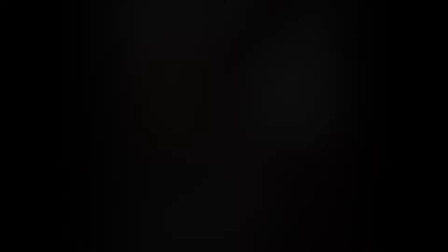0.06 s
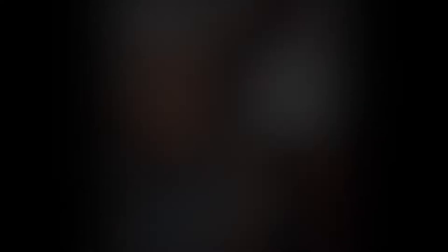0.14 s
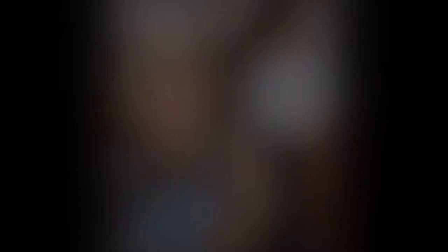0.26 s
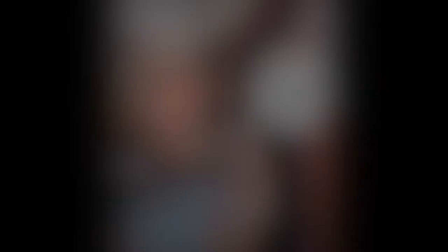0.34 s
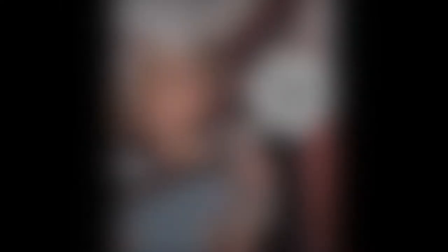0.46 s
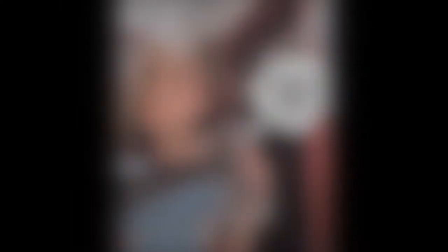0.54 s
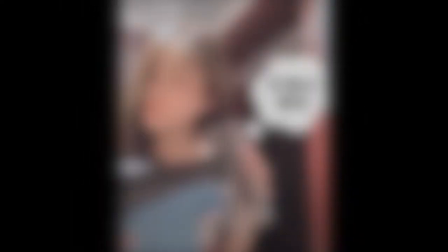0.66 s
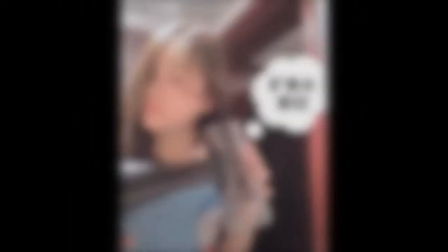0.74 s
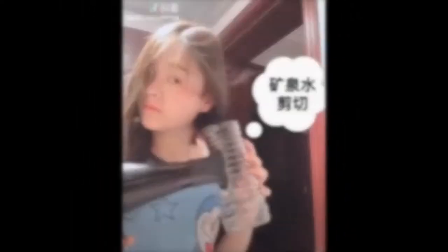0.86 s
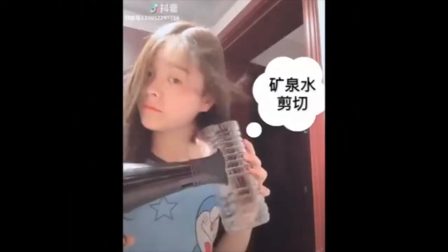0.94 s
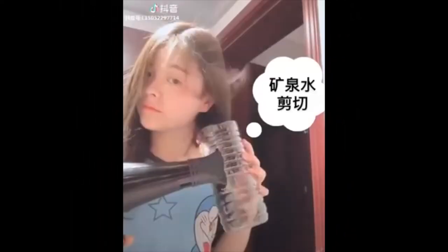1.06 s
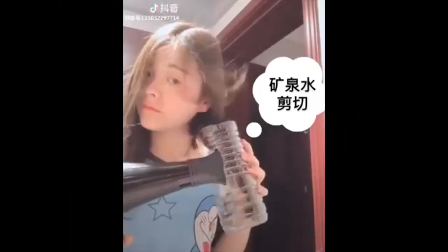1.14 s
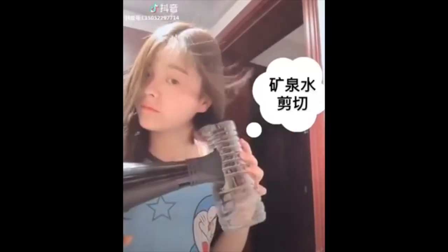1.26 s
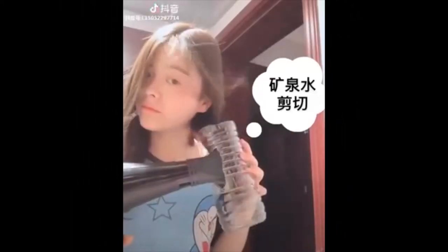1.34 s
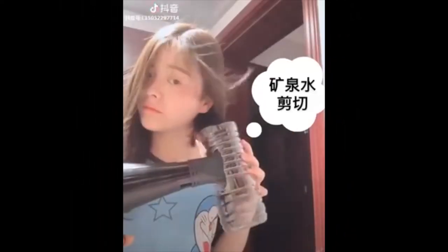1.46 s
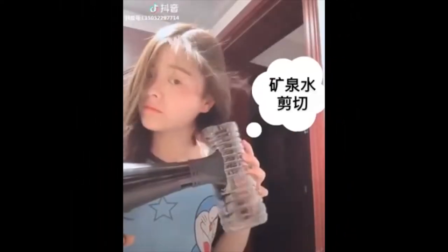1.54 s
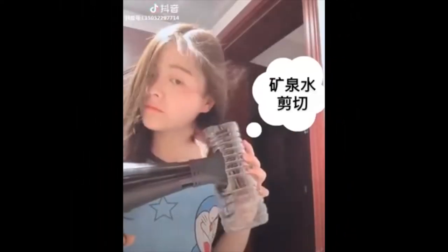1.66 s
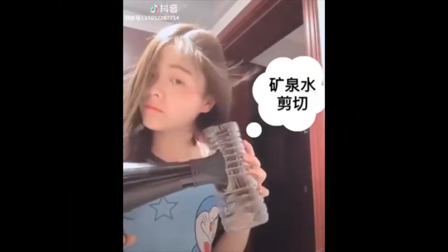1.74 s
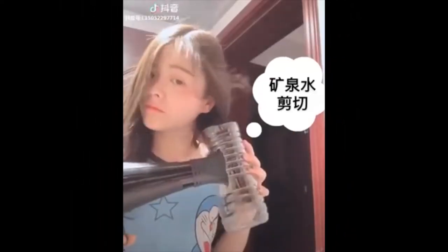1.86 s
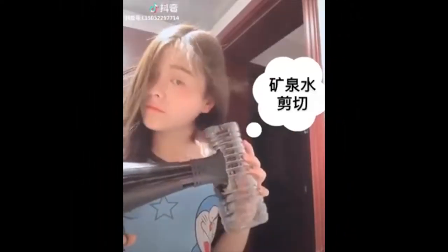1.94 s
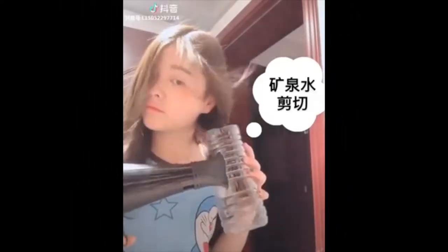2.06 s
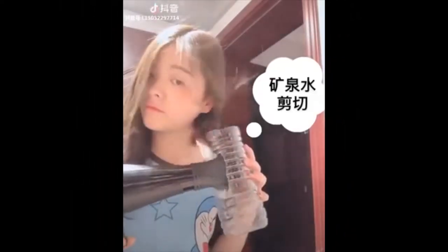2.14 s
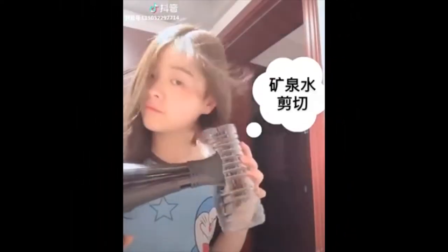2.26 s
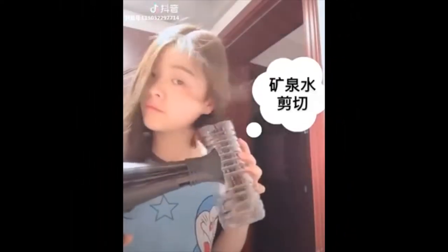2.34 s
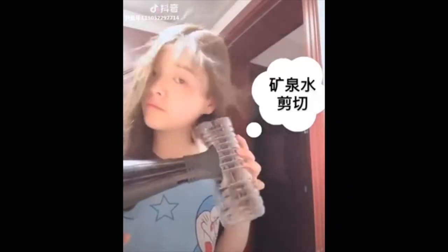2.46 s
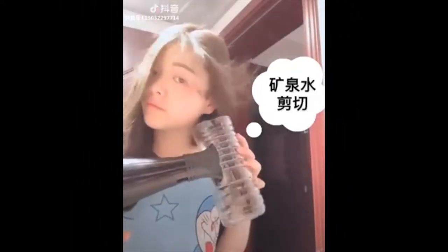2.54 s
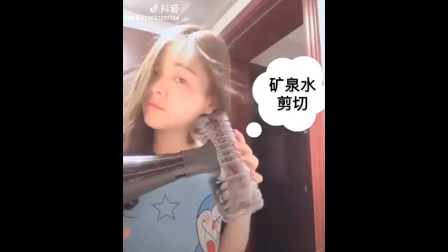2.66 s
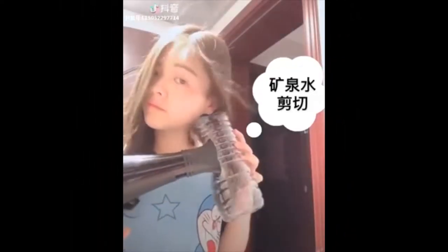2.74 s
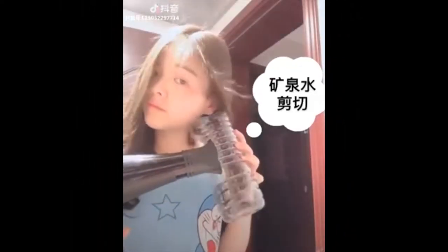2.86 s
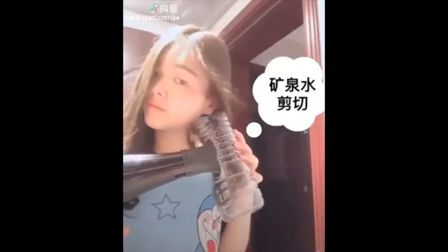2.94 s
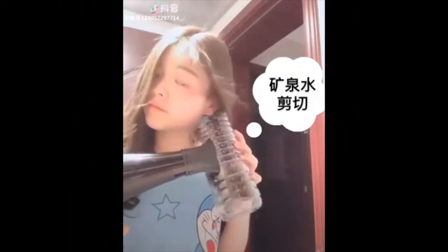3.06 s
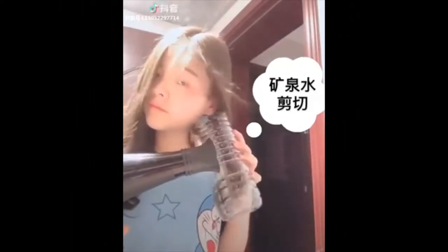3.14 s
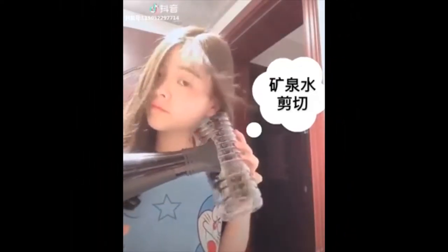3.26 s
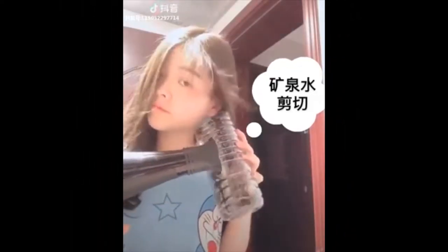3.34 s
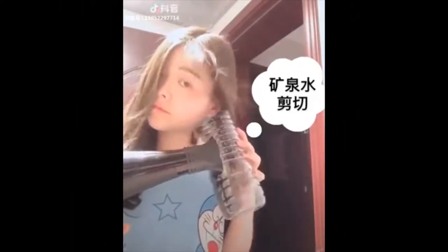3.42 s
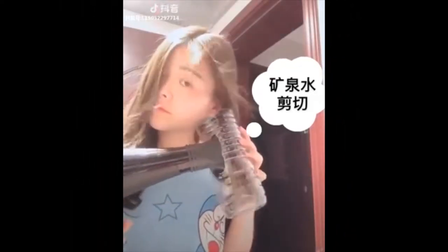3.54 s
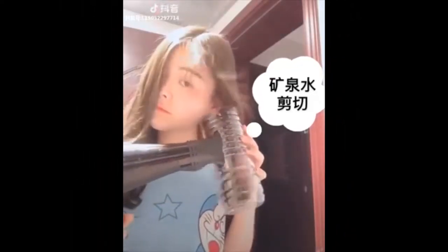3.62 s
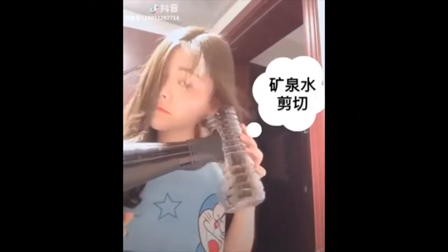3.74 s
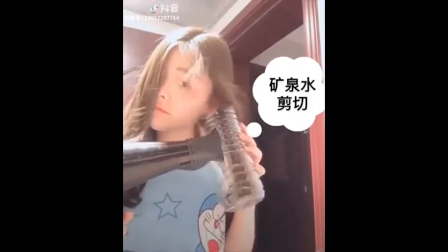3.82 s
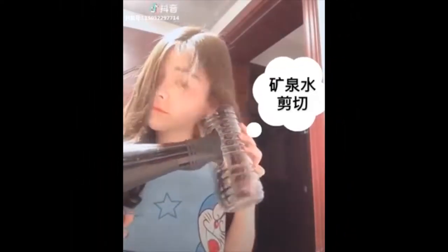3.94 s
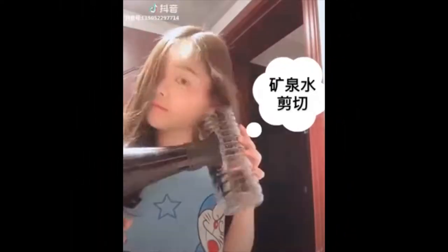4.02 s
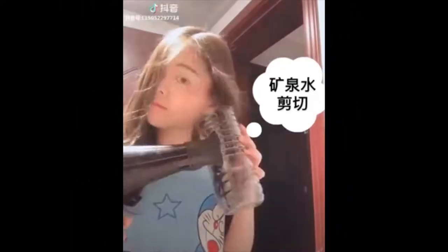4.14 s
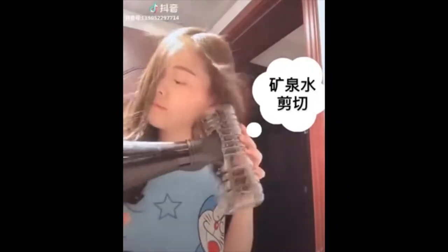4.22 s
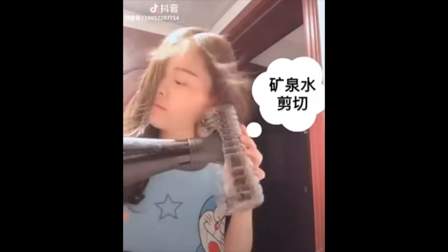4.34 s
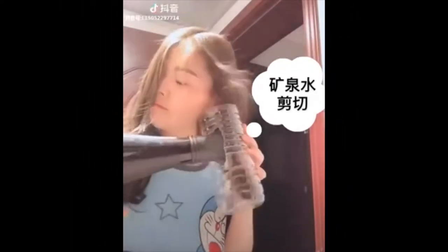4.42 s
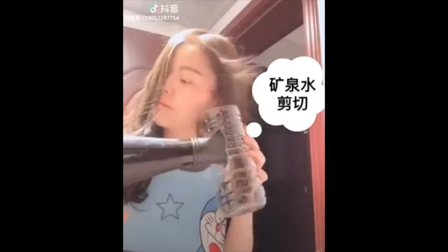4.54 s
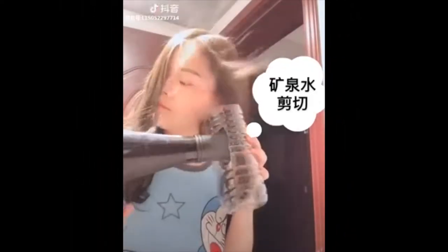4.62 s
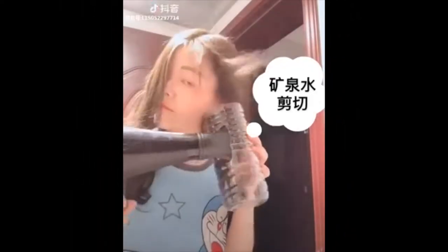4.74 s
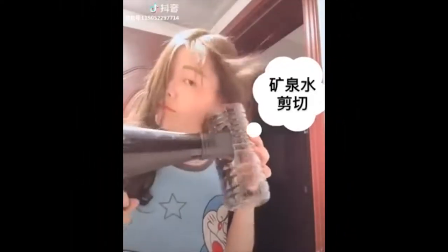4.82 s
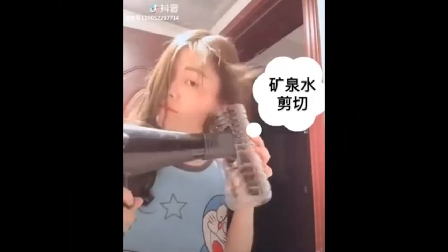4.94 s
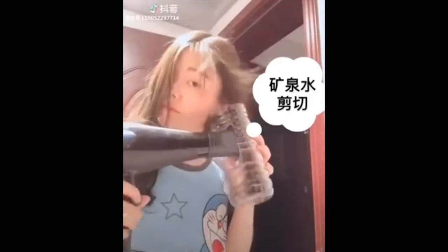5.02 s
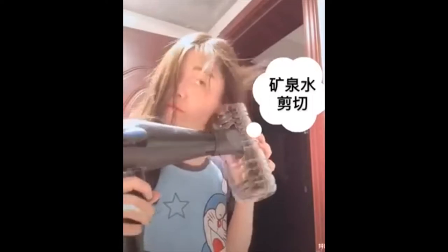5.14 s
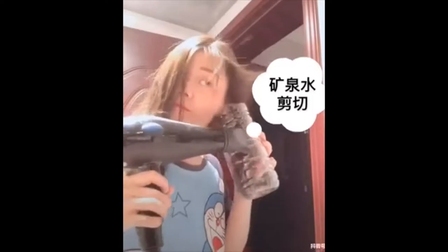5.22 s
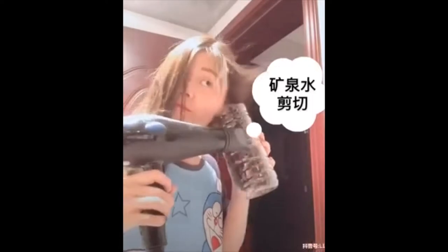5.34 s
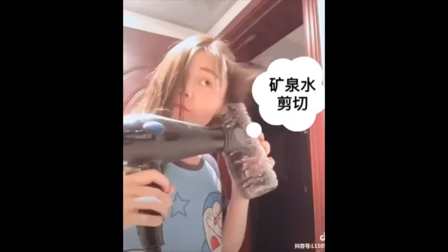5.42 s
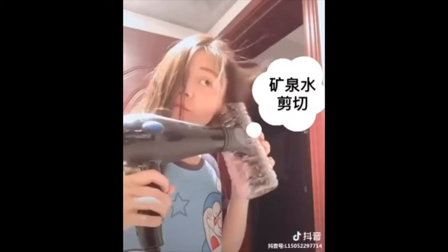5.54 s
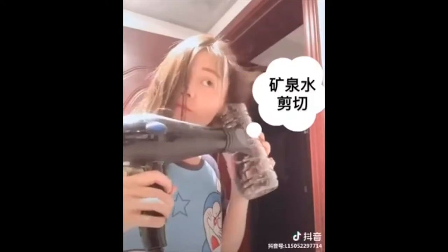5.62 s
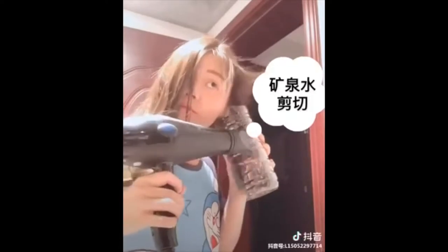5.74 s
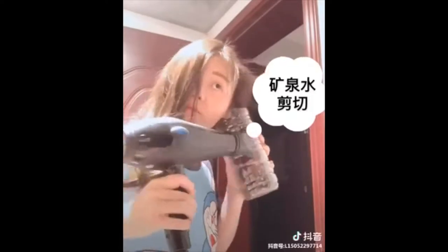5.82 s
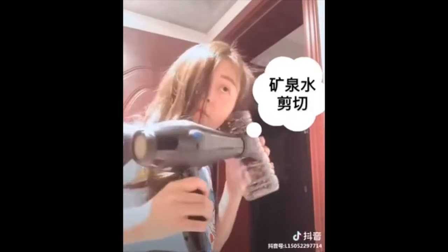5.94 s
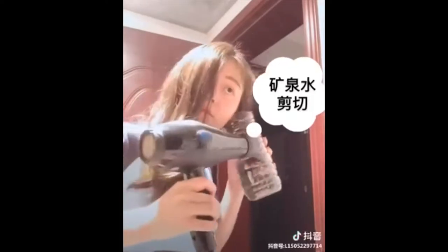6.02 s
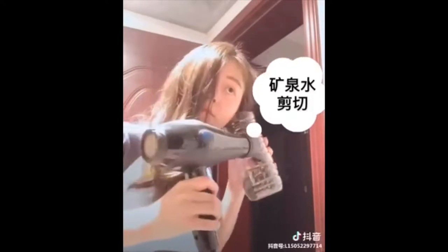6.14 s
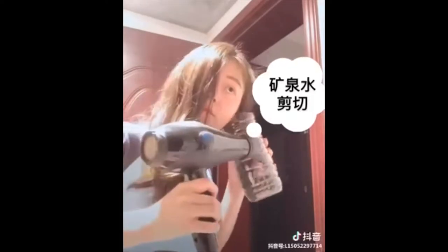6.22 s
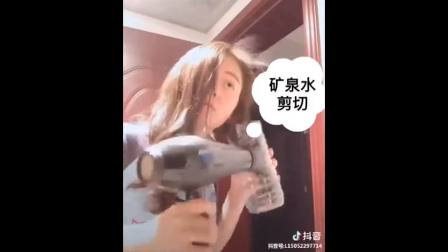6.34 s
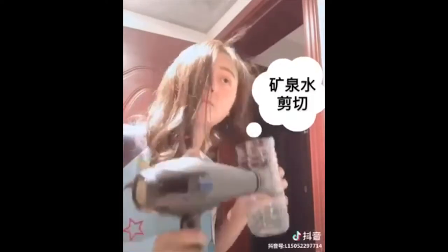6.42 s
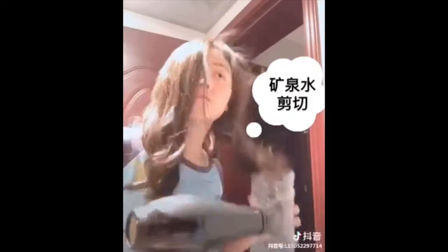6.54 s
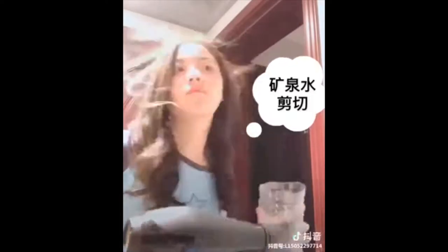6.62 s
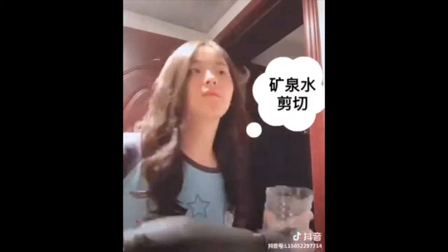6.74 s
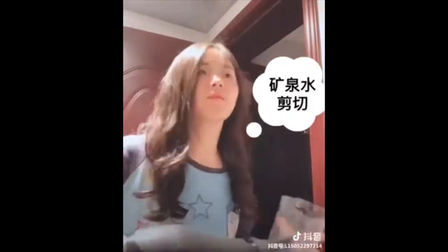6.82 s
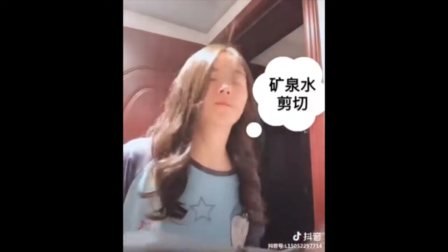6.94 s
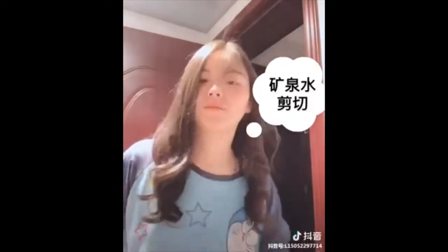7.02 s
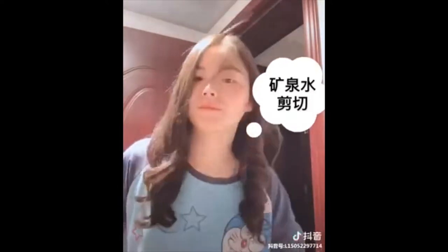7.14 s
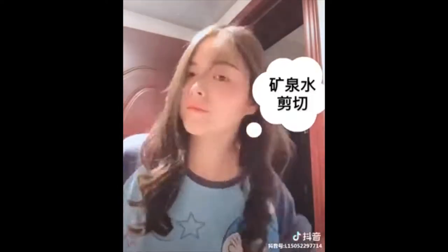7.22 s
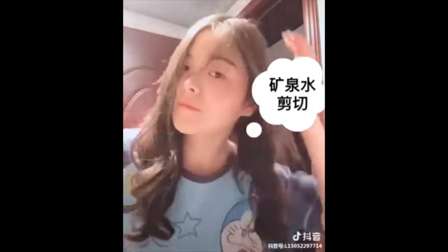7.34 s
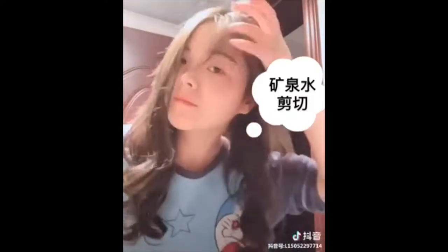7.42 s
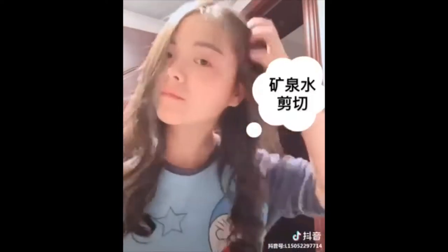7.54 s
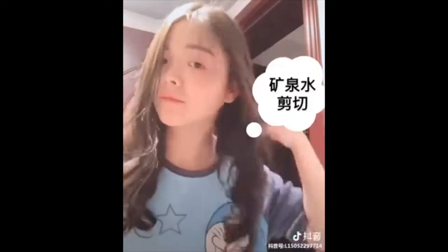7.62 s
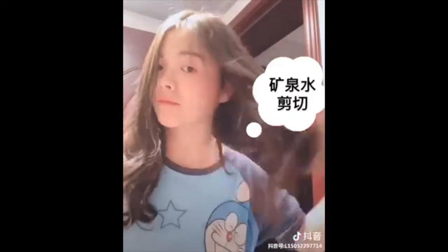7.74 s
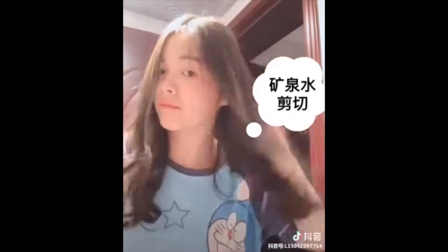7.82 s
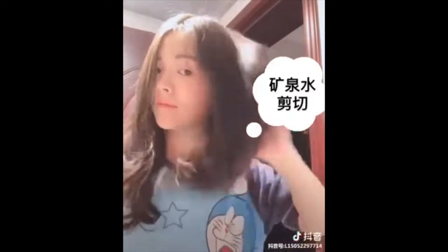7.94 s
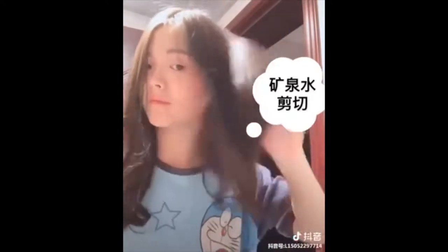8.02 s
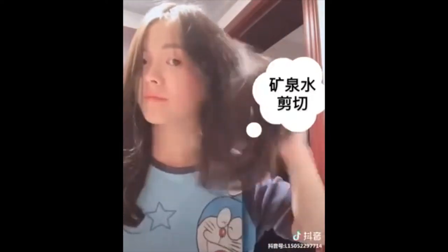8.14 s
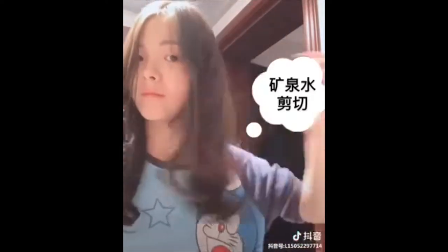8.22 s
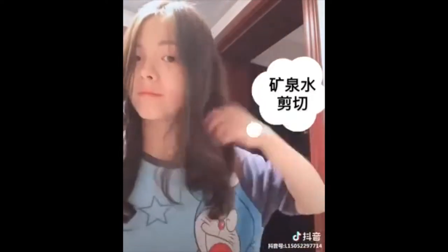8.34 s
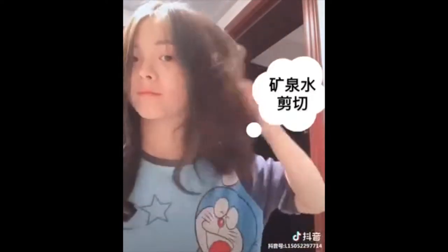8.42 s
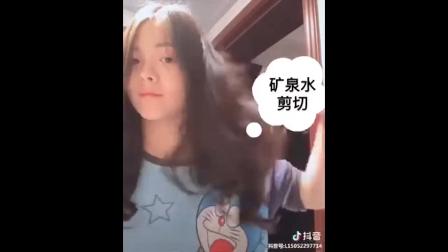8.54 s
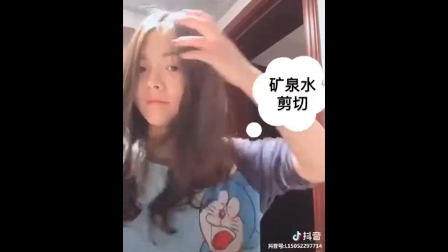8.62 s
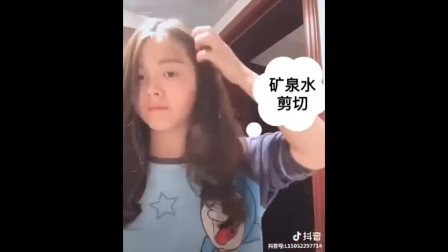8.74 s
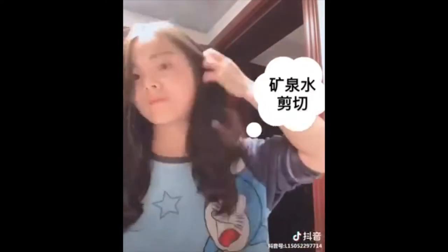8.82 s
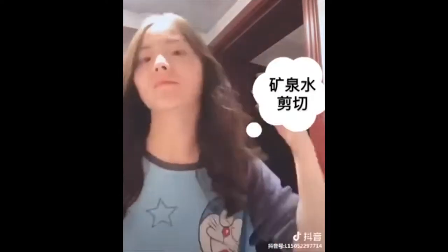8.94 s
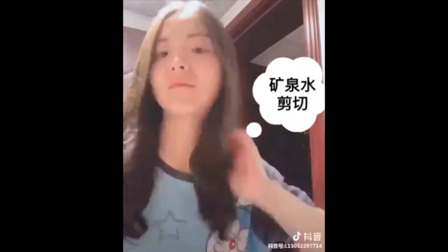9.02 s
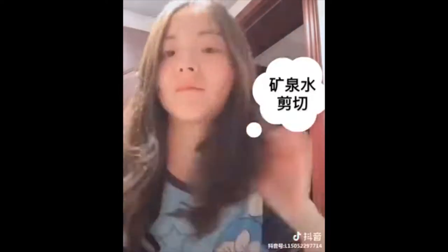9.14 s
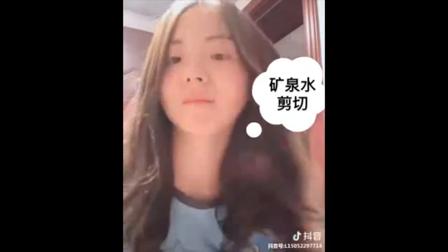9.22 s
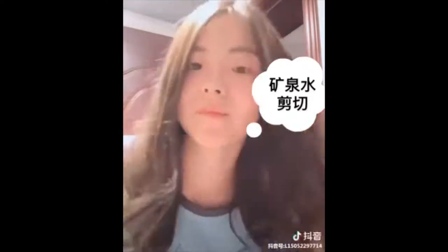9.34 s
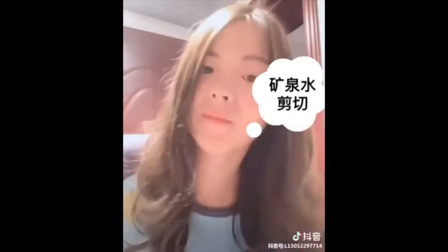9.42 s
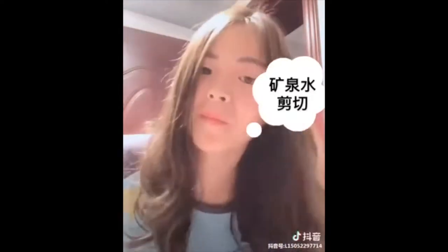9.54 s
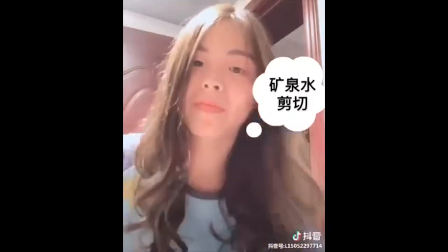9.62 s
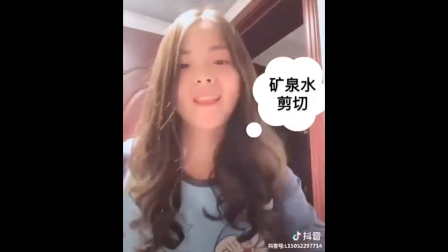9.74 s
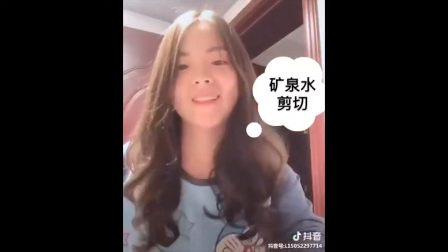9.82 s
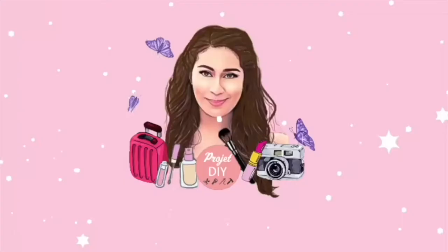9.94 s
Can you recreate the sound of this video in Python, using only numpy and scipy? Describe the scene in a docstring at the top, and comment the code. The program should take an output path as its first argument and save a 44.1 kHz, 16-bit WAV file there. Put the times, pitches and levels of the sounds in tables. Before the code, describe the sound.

In a small bedroom, close to the microphone, a hair dryer runs into a plastic bottle, making it drone hollowly under the rushing air. It grows more sizzling before it cuts off. Air whooshes by once, then a short, booming blast hits the microphone and briefly overloads it. Afterwards there is only quiet rustling of hair and cloth, with a few dull bumps and light plastic taps.

```python
"""Hair dryer and plastic bottle

A hair dryer blows into a cut plastic bottle in a small bedroom, and the bottle booms hollowly.
The dryer turns its hissing intake forward, is lowered and switched off; its jet whooshes past once.
A gust of air then brings short clacks, and the overloaded microphone rasps on the two hardest puffs.
Hair and sleeves rustle in the quiet room, among a few light taps and soft bumps."""
import sys
import numpy as np
from scipy import signal
from scipy.fft import rfft, irfft, next_fast_len
from scipy.io import wavfile
from scipy.ndimage import uniform_filter1d

SR = 44100
rng = np.random.default_rng(int(sys.argv[2]) if len(sys.argv) > 2 else 0)


def bounce(signal):
    """Save signal as a 16-bit WAV file at the path given by the first command-line argument."""
    frames = np.transpose(np.atleast_2d(signal))
    limited = np.clip(frames, -1, 1)
    pcm = np.round(limited * 32767).astype(np.int16)
    wavfile.write(sys.argv[1], SR, pcm)


N = 439677
T = np.arange(N) / SR
HZ = np.maximum(np.fft.rfftfreq(next_fast_len(N), 1 / SR), 1)

# how far the dryer's intake faces forward (time [s], share [0-1])
INTAKE_TURN = [(4.4, 0.27), (5.2, 0.45), (5.7, 0.68), (6.0, 0.74), (6.7, 0.7), (6.9, 0.2)]
# tone colour of the air jet (frequency [Hz], relative level [dB])
JET_COLOUR = [(45, -48), (75, -41.5), (180, -32.5), (290, -10.5), (420, -19.3), (560, -20.3), (1000, -32.7),
              (2000, -34.6), (4400, -26.8), (7000, -34), (9000, -34), (13000, -39.8)]
# where the bottle, barrel and space around them ring (frequency [Hz], width [Hz], boost [dB])
BOTTLE_RINGS = [(92.2, 23, 17.8), (118, 12, -6), (135, 22, 14.7), (170, 40, 1), (190, 16, -4),
                (218.2, 26, 14.4), (317.4, 58, 4.5), (395, 50, 15.3), (472, 45, 6.5), (551, 22, 3),
                (582, 25, -4), (623.4, 16, 5.5), (698, 17, 10.5), (732, 24, -5), (810, 23, 12),
                (890, 66, 17), (1036, 40, 4), (1135, 100, 10), (1178, 24, -7), (1268, 250, 17.8),
                (1544, 150, 6), (1800, 280, 12.5), (2252, 140, 12), (2375, 140, 8.5), (2844, 370, 5),
                (3335, 220, 6.5), (3520, 110, -4), (3680, 100, 9), (3910, 130, 4), (4590, 100, 5),
                (5410, 110, 3), (5650, 120, -3), (6550, 2300, 6.5), (7450, 300, -3), (7830, 200, 3.5)]
# tone colour of air rushing into the intake (frequency [Hz], relative level [dB])
INTAKE_COLOUR = [(600, -17.5), (1500, -32.8), (3000, -29.7), (4600, -36.5), (7000, -27.5), (7700, -32.5),
                 (10500, -32), (13000, -34)]
# where the fan housing and grille ring (frequency [Hz], width [Hz], boost [dB])
HOUSING_RINGS = [(858, 90, 10), (1032, 100, 10), (1288, 170, 20.5), (1512, 120, 8.5), (1765, 220, 10.5),
                 (2430, 240, 6), (2760, 160, -3), (2920, 110, 7), (4250, 900, 9.5), (4740, 220, -4),
                 (5380, 450, 7), (5750, 200, -3), (7180, 160, 5), (8950, 400, 5.5), (9600, 250, 3)]
# whine of motor and fan (frequency [Hz], level against the hiss [dB], width [Hz])
WHINE_TONES = [(4119, -24, 12), (4340, -20, 7), (8678, -26, 18)]
# swells of a high whistle (time [s], level against the hiss [dB], half length [s])
WHISTLE_SWELLS = [(3.9, -22, .1), (5.06, -21.5, .1)]
# hisses at the bottle's edge (width [Hz], path of (time [s], pitch [Hz], level against the hiss [dB]))
EDGE_HISSES = [(220, [(4.3, 2290, -40), (5.2, 2300, -13), (5.8, 2330, -14), (6.05, 2400, -20),
               (6.35, 2450, -14), (6.6, 2450, -28)]), (420, [(5.4, 4100, -40), (5.98, 4050, -13.5),
               (6.4, 4100, -13), (6.6, 4320, -8.5), (6.9, 4300, -18)]), (450, [(5.8, 5300, -40),
               (6.02, 5250, -12), (6.4, 5250, -13), (6.57, 5430, -9), (6.9, 5400, -22)]),
               (800, [(5.4, 6900, -40), (5.7, 6900, -15), (5.9, 6850, -8.5), (6.25, 6250, -11.5),
               (6.65, 6750, -11), (6.9, 6700, -16)])]
# tone colour of the bare nozzle (frequency [Hz], relative level [dB])
SIZZLE_COLOUR = [(7500, -25.5), (8800, 0.5), (10500, -3.5), (13000, -1)]
# tone colour of the passing jet (frequency [Hz], relative level [dB])
WHOOSH_COLOUR = [(59, -59), (100, -22), (250, -19), (490, -8.5), (678, -29), (815, -19), (1410, -28),
                 (1770, -24), (2170, -23), (2770, -26), (5530, -19.5), (10200, -33), (13000, -54)]
# where the open bottle rings (frequency [Hz], width [Hz], boost [dB])
OPEN_BOTTLE_RINGS = [(380, 70, 7), (505, 70, 10.5), (1135, 90, 15), (1400, 120, 14), (2160, 230, 12.5),
                     (2480, 110, 8), (2760, 160, -5), (3740, 200, 8), (4010, 130, 7), (4280, 180, 8.5),
                     (5400, 260, 5.5), (6750, 450, 6.5), (7900, 900, -2.5)]

# hum of the microphone's opening in the gust (frequency [Hz], relative level [dB])
MIC_COLOUR = [(45, -41), (90, -30), (130, -13.5), (200, -15), (238, -11), (300, -13), (345, -1), (415, 4),
              (455, -5), (482, 0), (535, -16), (570, -17), (605, -14), (655, -32)]
# low tones of the hollow ring under the gust (frequency [Hz], level [dB])
HOLLOW_TONES = [(237, -31), (350, -13.5), (398, -11)]
# tone colour of the gust's rush (frequency [Hz], relative level [dB])
RUSH_COLOUR = [(500, -28), (700, -3), (830, 3), (1050, -11.5), (1400, 0), (1850, -7), (2250, -5),
               (4800, -19.5), (7000, -18.5), (13000, -34)]
# narrow peaks in that rush (frequency [Hz], width [Hz], boost [dB])
RUSH_PEAKS = [(1610, 60, 7), (2930, 110, 7), (3950, 200, 6), (4580, 130, 4), (6820, 150, 6), (7130, 100, 6)]
# hissing surges in the gust (time [s], level [dB], half length [s])
GUST_SURGES = [(7.262, -28.5, .012), (7.326, -33.5, .004), (7.345, -30, .009), (7.393, -40, .011),
               (7.486, -33, .016), (7.57, -42, .022), (7.66, -43.5, .026)]
# puffs of air hitting the microphone (time [s], level [dB], half length [s])
AIR_PUFFS = [(7.2735, 3, .0043), (7.287, -3.5, .005), (7.303, -6, .0035), (7.321, -6.5, .004),
             (7.343, 3.5, .0036), (7.361, -6, .0045), (7.432, -6, .004), (7.456, -9.5, .005),
             (7.485, -12.5, .004), (7.57, -17, .004), (7.597, -20, .005)]
# short clacks and two rasps of the overloaded mic (time [s], level [dB], half length [s], pitch [Hz])
CLACKS_AND_RASPS = [(7.27, -28, .003, 2200), (7.272, -23, .003, 1250), (7.341, -25, .003, 1200),
                    (7.304, -36, .003, 2850), (7.313, -46, .008, 7200), (7.33, -31.5, .0035, 5850),
                    (7.348, -42, .004, 11000), (7.393, -40, .006, 3000), (7.576, -41, .003, 1650)]

# strokes through the hair (time [s], level [dB], half length [s])
HAIR_STROKES = [(7.83, -73, .025), (7.95, -66.5, .018), (8.005, -69, .016), (8.06, -69, .012),
                (8.127, -67.5, .012), (8.205, -64.5, .011), (8.35, -65.5, .009), (8.46, -73.5, .03),
                (8.87, -67.5, .06), (9.15, -73, .03), (9.295, -68, .018), (9.33, -64.5, .016)]
# hair squeaking between fingers (time [s], level [dB], half length [s], pitch [Hz])
HAIR_SQUEAKS = [(8.755, -73, .045, 4780), (8.79, -74.5, .06, 3850)]
# scuffs of cloth (time [s], level [dB], half length [s], pitch [Hz])
CLOTH_SCUFFS = [(9.796, -62, 0.013, 12000), (9.905, -68, .01, 8400), (9.95, -61, 0.011, 7200)]
# light taps on plastic (time [s], level [dB], half length [s])
PLASTIC_TAPS = [(9.488, -58.5, 0.02), (9.574, -55, 0.016)]
# tone colour of the taps (frequency [Hz], relative level [dB])
TAP_COLOUR = [(800, -8), (2500, -6), (6000, -13), (12000, -26)]
# where the tapped plastic rings (frequency [Hz], width [Hz], boost [dB])
TAP_RINGS = [(2520, 260, 11), (3300, 340, 12), (4270, 200, 13)]
# dull bumps of a moving body (time [s], level [dB], half length [s])
BODY_BUMPS = [(8.25, -57, 0.045), (8.556, -49.5, 0.055), (8.779, -51, 0.031)]
# soft nudges of the microphone (time [s], level [dB], half length [s])
MIC_NUDGES = [(9.876, -44.5, 0.011), (9.933, -43.5, 0.008)]
# tones that a nudge rings with (frequency [Hz], relative level [dB])
NUDGE_TONES = [(435, 0), (895, -10), (1145, -19)]
# tone colour of the quiet room (frequency [Hz], relative level [dB])
ROOM_COLOUR = [(30, -20), (70, -13), (130, -9), (200, -13), (300, -8), (440, -7), (700, -20), (1100, -26),
               (2500, -28.5), (5000, -36), (8000, -39), (13000, -39)]
# where the room rings (frequency [Hz], width [Hz], boost [dB])
ROOM_RINGS = [(101.2, 37, 10), (132.2, 13, 6), (240, 16, 9), (890, 83, 4), (1500, 400, 6.5)]


def dryer(split_hz=650, boom_db=-21, nozzle_db=-29, intake_db=-24):
    """The jet makes the bottle boom; turning swaps nozzle for intake hiss. Gives (sound, hiss gain)."""
    turn = np.clip(in_time(INTAKE_TURN)[0], 0, 1)
    jet = colour(JET_COLOUR, BOTTLE_RINGS)
    boom = steadied(noise(jet * below(split_hz)), window_s=0.32)
    nozzle = np.sqrt(1 - turn) * noise(jet * above(split_hz))
    intake = np.sqrt(turn) * noise(colour(INTAKE_COLOUR, HOUSING_RINGS) * above(split_hz))
    hiss = nozzle + intake + motor_whine() + edge_hiss() + sizzle(turn)
    boom_gain = dryer_gain(near_db=2.5, loss_db=8) * from_db(boom_db)
    hiss_db = (1 - turn) * nozzle_db + turn * intake_db
    hiss_gain = dryer_gain(near_db=0.8, loss_db=12.5) * from_db(hiss_db)
    return boom_gain * boom + hiss_gain * hiss, hiss_gain


def dryer_gain(near_db, loss_db, off_s=6.857, coast_db_per_s=70):
    """The dryer fades in, swings nearer, is lowered and dies away once it is switched off."""
    nearer_db = near_db * swell(time_s=6.64, db=0, half_s=.07)
    lowered_db = loss_db * ramp(start_s=6.705, length_s=0.12)
    return fade_in() * from_db(nearer_db - lowered_db - coast_db_per_s * since(off_s))


def motor_whine():
    """An unsteady load blurs each motor tone; a high whistle comes and goes with the dryer's angle."""
    tones = sum(from_db(db) * rms_one(1 / (1 + ((HZ - hz) / width) ** 2))
                for hz, db, width in WHINE_TONES)
    whistle = swells(WHISTLE_SWELLS) * band(rng.standard_normal(N), hz=8720, octaves=.008)
    return filtered(rng.standard_normal(N), tones) + whistle


def edge_hiss():
    """Narrow hisses swell and glide as the jet grazes the bottle's edge at a changing angle."""
    hiss = 0
    for width_hz, path in EDGE_HISSES:
        pitch_hz, db = in_time(path)
        tone = np.sqrt(2) * np.cos(2 * np.pi * np.cumsum(pitch_hz) / SR)
        flutter = signal.lfilter(*signal.butter(2, width_hz / 2, fs=SR), rng.standard_normal(N))
        hiss = hiss + from_db(db) * tone * rms_one(flutter)
    return hiss


def sizzle(turn):
    """The nozzle slips out of the bottle and sizzles brightly, less so as the intake turns forward."""
    exposed = ramp(start_s=5.1, length_s=0.38) * np.sqrt(1 - turn)
    return from_db(-16.5) * exposed * noise(colour(SIZZLE_COLOUR))


def whoosh(time_s=7.0165, db=-13.3, half_s=.012):
    """The jet sweeps across the microphone: a hard core inside a softer, wider fringe."""
    core = swell(time_s, db, half_s)
    fringe = swell(time_s, db - 12, half_s * 2.2)
    air = steadied(noise(colour(WHOOSH_COLOUR, OPEN_BOTTLE_RINGS)), window_s=0.015)
    return air * np.hypot(core, fringe)


def gust(peak_s=7.272, end_s=7.712, rise_db_per_s=779, ebb_db_per_s=44.5, fall_db_per_s=326):
    """Swirling air booms in the microphone's opening, with a surging rush and a run of hard puffs."""
    rise_db = rise_db_per_s * np.minimum(T - peak_s, 0)
    force = from_db(rise_db - ebb_db_per_s * since(peak_s) - fall_db_per_s * since(end_s)) + 1e-18
    swirls = from_db(-11.5) * steadied(noise(colour(MIC_COLOUR) * below(750)), window_s=0.028)
    rush_gain = np.hypot(from_db(-34.5) * force, swells(GUST_SURGES))
    rush = rush_gain * noise(colour(RUSH_COLOUR, RUSH_PEAKS))
    # a hard puff pushes the boom aside while it lasts
    boom_share = 1 - np.clip(swells(AIR_PUFFS) / force, 0, 1)
    return boom_share * force * (swirls + hollow_ring()) + rush + mic_rings(AIR_PUFFS, hz=395)


def hollow_ring(in_step_s=7.281):
    """Low tones line up at one moment and throb against each other."""
    return sum(from_db(db) * np.cos(2 * np.pi * hz * (T - in_step_s)) for hz, db in HOLLOW_TONES)


def mic_rings(pushes, hz):
    """Each push makes the microphone's opening ring briefly at one pitch."""
    return sum(swell(time_s, db, half_s) * np.cos(2 * np.pi * hz * (T - time_s))
               for time_s, db, half_s in pushes)


def clacks_and_rasps():
    """Short clacks, and the rasp of the overloaded microphone on the two hardest puffs."""
    return bursts(rng.standard_normal(N), CLACKS_AND_RASPS, width_hz=650)


def rustles(grain_db=3, grain_hz=300):
    """Surfaces catch and slip unevenly: the sliding switch, hair and cloth."""
    friction = rng.standard_normal(N) * from_db(grain_db * noise(below(grain_hz, order=2)))
    switch = swell(time_s=6.9, db=-32, half_s=0.019) * band(friction, hz=1550, octaves=1.1)
    strokes = swells(HAIR_STROKES) * band(friction, hz=4000, octaves=2.5)
    squeaks = bursts(friction, HAIR_SQUEAKS, width_hz=220)
    cloth = bursts(friction, CLOTH_SCUFFS, width_hz=1200)
    return switch + strokes + squeaks + cloth


def taps():
    """Two brushing touches make a small plastic object ring."""
    return swells(PLASTIC_TAPS) * noise(colour(TAP_COLOUR, TAP_RINGS))


def movements():
    """A body shifts with dull bumps; the nudged microphone rings and scuffs softly."""
    bumps = swells(BODY_BUMPS) * steadied(noise(hump(100, octaves=0.13)), window_s=.04)
    nudges = sum(from_db(db) * mic_rings(MIC_NUDGES, hz) for hz, db in NUDGE_TONES)
    scuff = from_db(-20) * swells(MIC_NUDGES) * noise(hump(1000, octaves=0.6))
    return bumps + nudges + scuff


def thin_hiss(gain):
    """A thin, very high hiss whose level follows the given gain."""
    return gain * from_db(-15) * noise(above(9700, order=40) * below(12600, order=12))


def wall_echoes(x, decay_s, echo_db):
    """Add a dense tail of echoes from the walls, falling 60 dB in decay_s."""
    t = T[:SR // 2]
    tail = rng.standard_normal(len(t)) * from_db(-60 * t / decay_s) * (t > .004)
    return x + from_db(echo_db) * signal.fftconvolve(x, tail / np.linalg.norm(tail))[:N]


def room_hum(x, hz=238, decay_s=0.49, hum_db=1):
    """A wave caught between the walls hums on after a loud sound."""
    decay = from_db(-60 / (decay_s * SR))  # share left after each sample
    feedback = [1, -2 * decay * np.cos(2 * np.pi * hz / SR), decay * decay]
    return x + from_db(hum_db) * signal.lfilter([1 - decay, 0, decay - 1], feedback, x)


def quiet_room():
    """A faint, low noise fills the bedroom."""
    return fade_in() * from_db(-56) * noise(colour(ROOM_COLOUR, ROOM_RINGS))


def from_db(db):
    """Turn decibels into a gain, the number a sound is multiplied by."""
    return 10 ** (np.asarray(db) / 20)


def rms_one(x):
    """Scale to an average power of one."""
    return x / np.sqrt(np.mean(x ** 2) + 1e-20)


def since(time_s):
    """Seconds gone by after a moment, zero before it."""
    return np.maximum(T - time_s, 0)


def ramp(start_s, length_s):
    """An even move from 0 to 1."""
    return np.minimum(since(start_s) / length_s, 1)


def fade_in():
    """The opening rise from silence."""
    return ramp(start_s=0.13, length_s=0.77) ** 1.48


def in_time(rows):
    """Join timed points into one curve per column."""
    times, *columns = np.transpose(rows)
    return [np.interp(T, times, column) for column in columns]


def swell(time_s, db, half_s):
    """A bell-shaped rise and fall that peaks at time_s."""
    gain = np.zeros(N)
    near = slice(*np.searchsorted(T, [time_s - 5 * half_s, time_s + 5 * half_s]))
    gain[near] = from_db(db) * np.exp(-.5 * ((T[near] - time_s) / half_s) ** 2)
    return gain


def swells(rows):
    """All the swells of a table added up."""
    return sum(swell(*row) for row in rows)


def bursts(x, rows, width_hz):
    """Short bursts of a noise, each around one pitch."""
    return sum(swell(time_s, db, half_s) * band(x, hz, octaves=np.log2(1 + width_hz / hz))
               for time_s, db, half_s, hz in rows)


def colour(points, rings=()):
    """Gain per frequency: a smooth curve with peaks and dips added."""
    hz, db = np.transpose(points)
    smooth_db = np.interp(np.log(HZ), np.log(hz), db)
    rings_db = sum(boost / (1 + (2 * (HZ - centre) / width) ** 2) for centre, width, boost in rings)
    return from_db(smooth_db + rings_db)


def above(edge_hz, order=8):
    """Gain that keeps the highs; a larger order cuts more sharply."""
    return 1 / np.sqrt(1 + (edge_hz / HZ) ** (2 * order))


def below(edge_hz, order=8):
    """Gain that keeps the lows."""
    return 1 / np.sqrt(1 + (HZ / edge_hz) ** (2 * order))


def hump(centre_hz, octaves):
    """Bell-shaped gain around one pitch."""
    return np.exp(-.5 * (np.log2(HZ / centre_hz) / octaves) ** 2)


def filtered(x, gain):
    """Pass a sound through a gain per frequency."""
    return irfft(rfft(x, next_fast_len(N)) * gain, next_fast_len(N))[:N]


def band(x, hz, octaves):
    """The part of a sound around one pitch, at a power of one."""
    edges = np.minimum(hz * 2 ** (np.array([-.5, .5]) * octaves), SR / 2 - 1)
    return rms_one(signal.lfilter(*signal.butter(1, edges, "band", fs=SR), x))


def noise(gain):
    """Noise of a given tone colour, at a power of one."""
    return rms_one(filtered(rng.standard_normal(N), gain))


def steadied(x, window_s):
    """Even out level changes that are slower than the window."""
    power = np.abs(uniform_filter1d(x ** 2, max(int(window_s * SR), 2)))
    return x / np.sqrt(power + 1e-9)


def scene():
    """All sources meet in the centre; a thin, very high hiss is added left and subtracted right."""
    room = quiet_room()
    air, hiss_gain = dryer()
    thin = thin_hiss(hiss_gain)
    treble = filtered(air, above(1500))
    # nearby walls colour only the dryer's treble
    blowing = air - treble + wall_echoes(treble, decay_s=0.06, echo_db=-17)
    passing_jet = wall_echoes(whoosh(), decay_s=0.34, echo_db=-24.5)
    buffeting = room_hum(gust())
    small_sounds = rustles() + clacks_and_rasps() + taps() + movements()
    centre = blowing + passing_jet + buffeting + small_sounds + room
    return np.array([centre + thin, centre - thin])


def record(dry, ceiling=.98, cutoff_hz=13150):
    """The overloaded microphone rounds off the loudest puffs; the highest treble is cut."""
    rounded = dry / (1 + np.abs(dry / ceiling) ** 6) ** (1 / 6)
    return np.array([filtered(channel, below(cutoff_hz, order=150)) for channel in rounded])


dry = scene()
out = record(dry)
bounce(out)
```